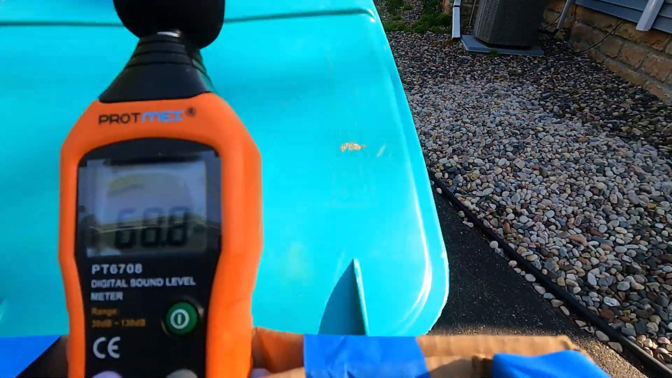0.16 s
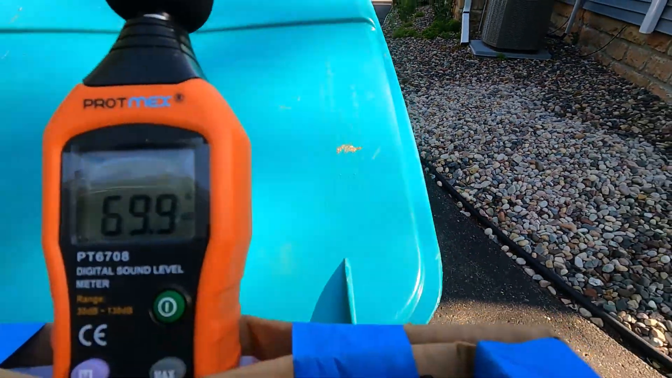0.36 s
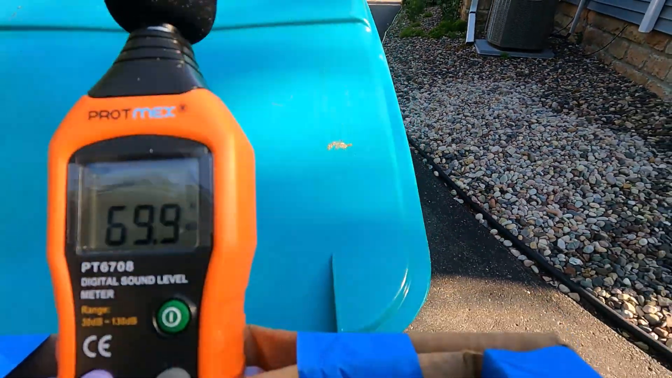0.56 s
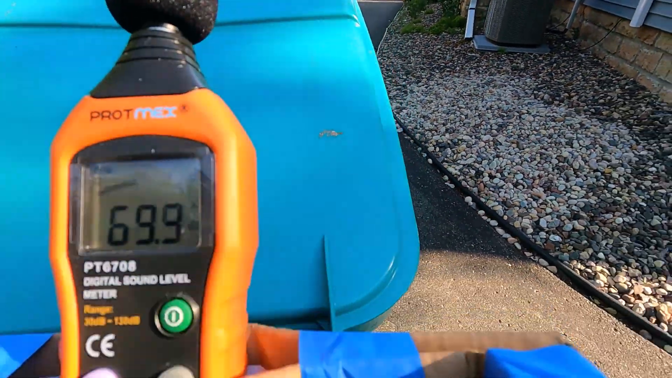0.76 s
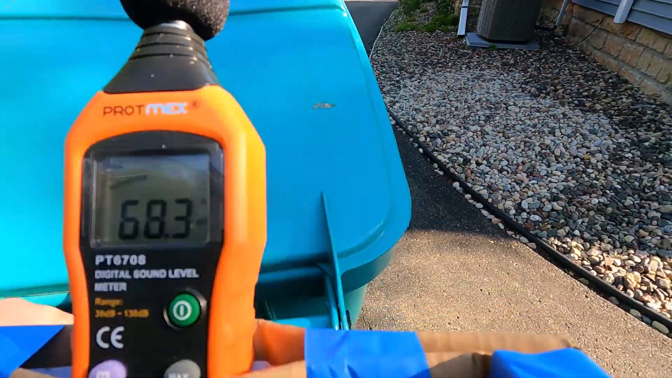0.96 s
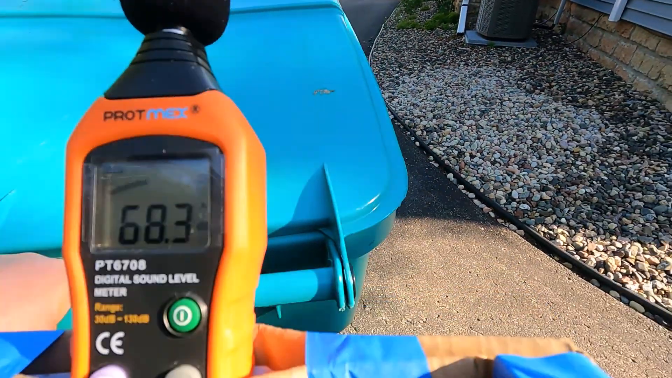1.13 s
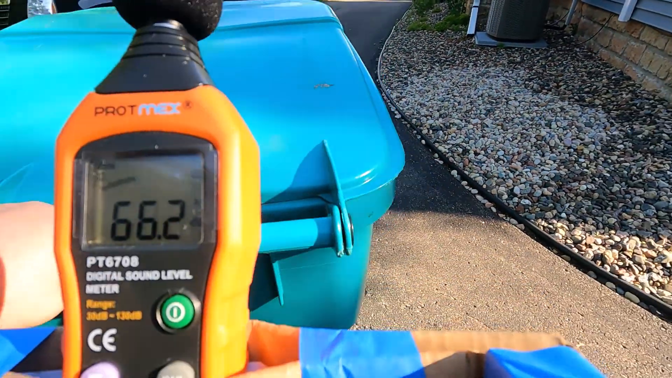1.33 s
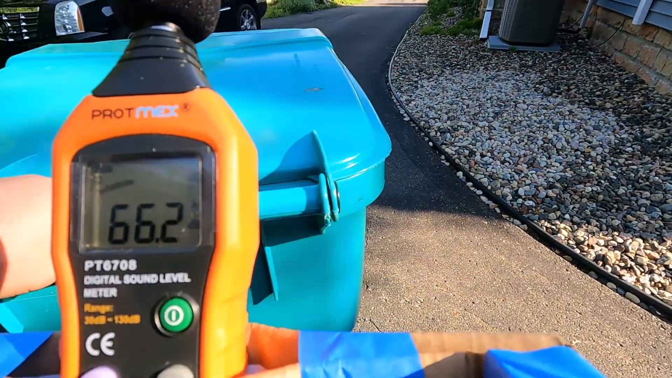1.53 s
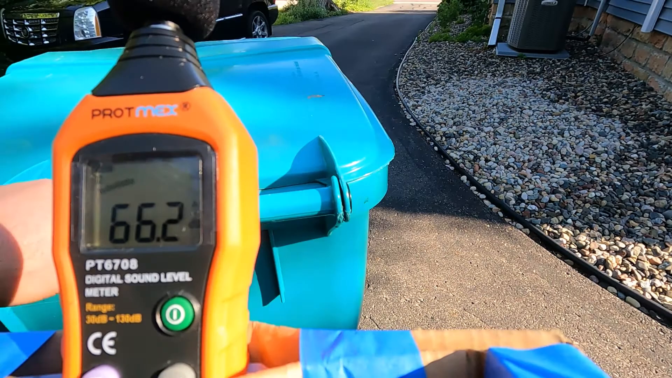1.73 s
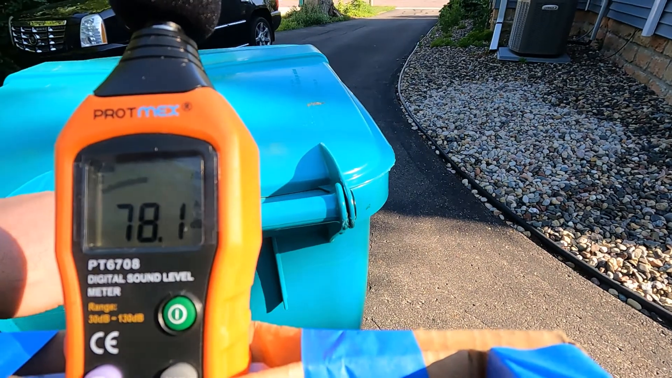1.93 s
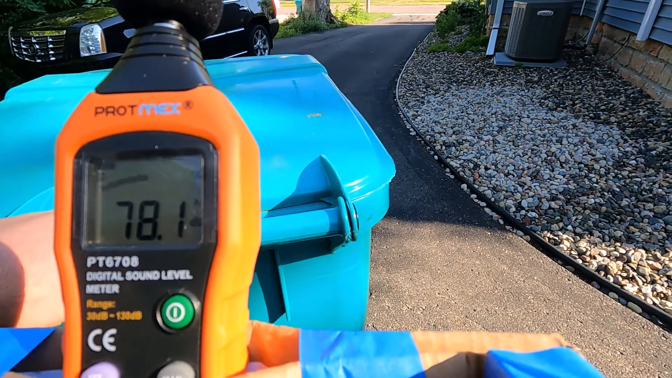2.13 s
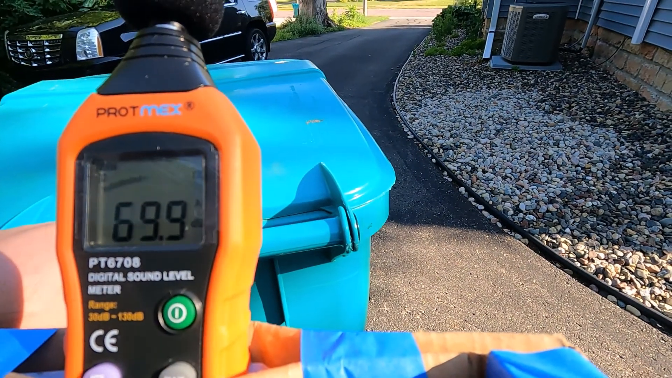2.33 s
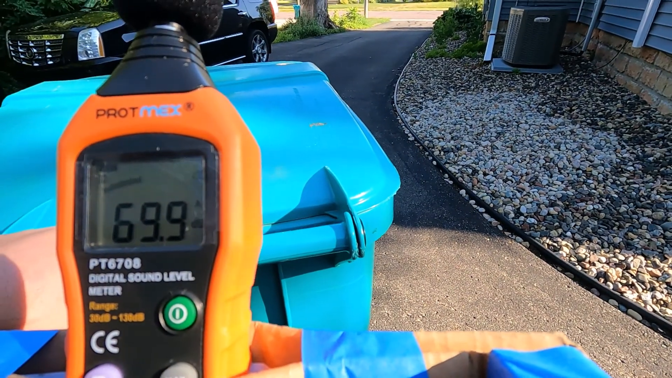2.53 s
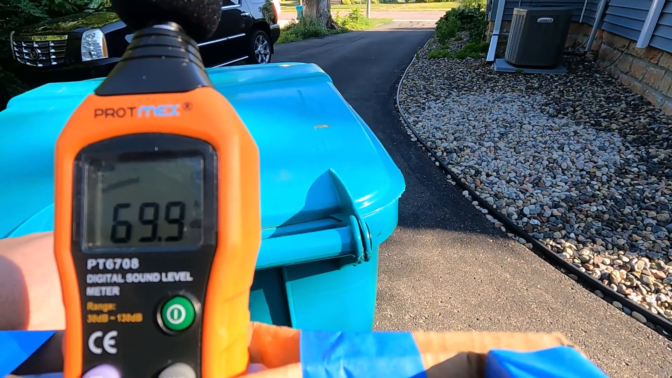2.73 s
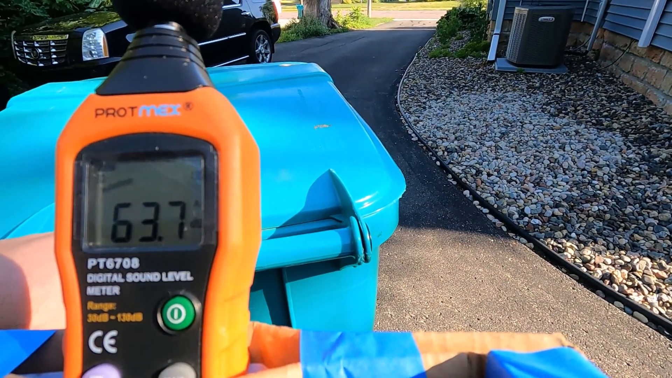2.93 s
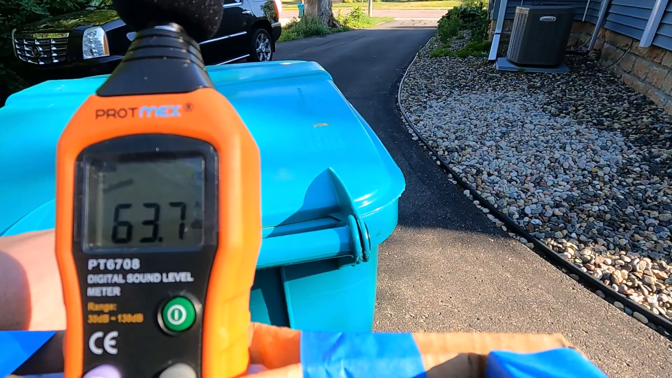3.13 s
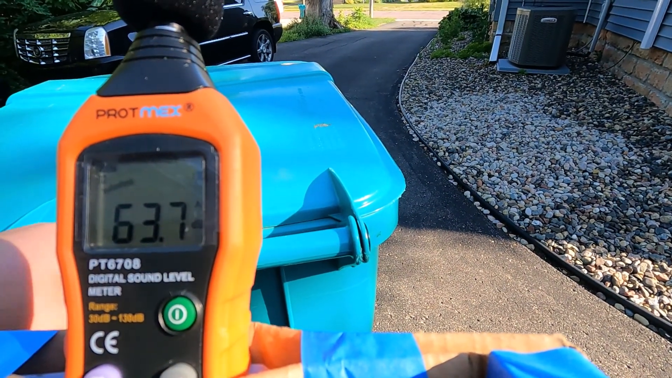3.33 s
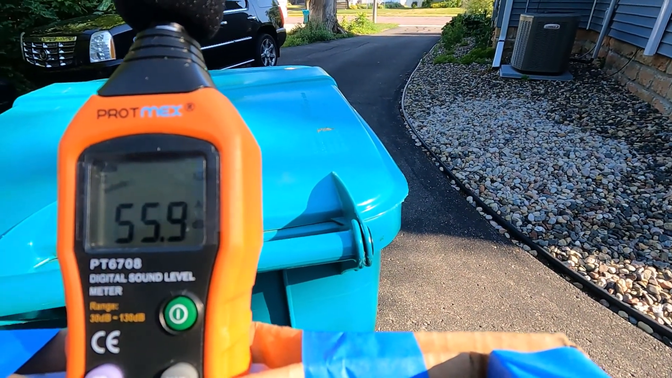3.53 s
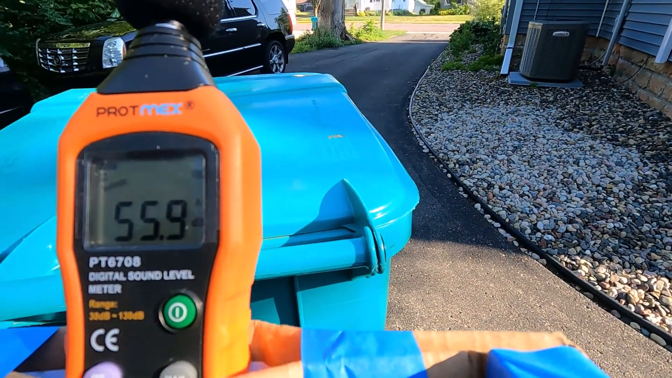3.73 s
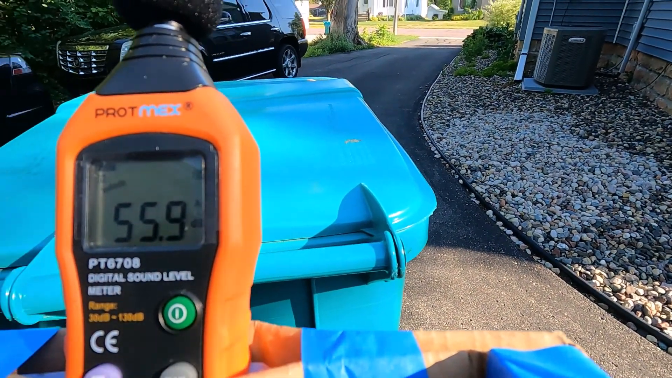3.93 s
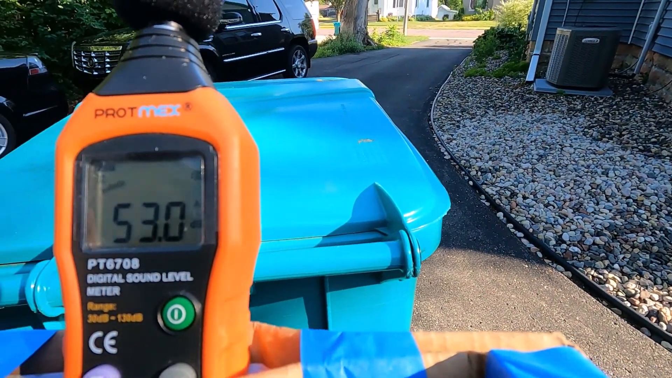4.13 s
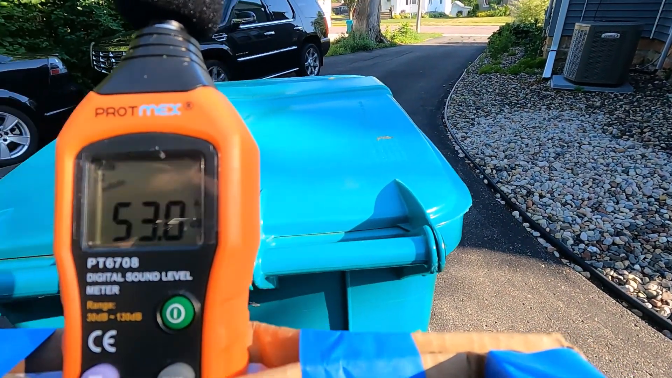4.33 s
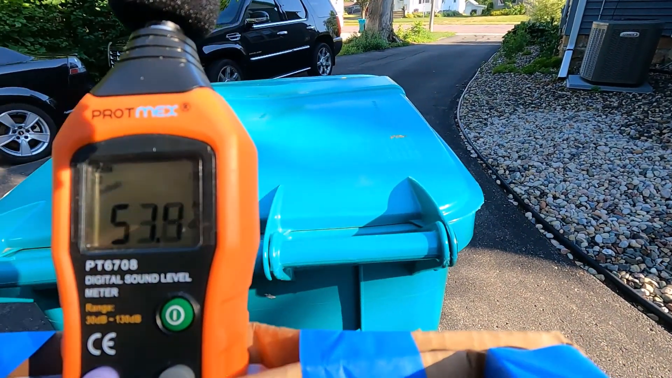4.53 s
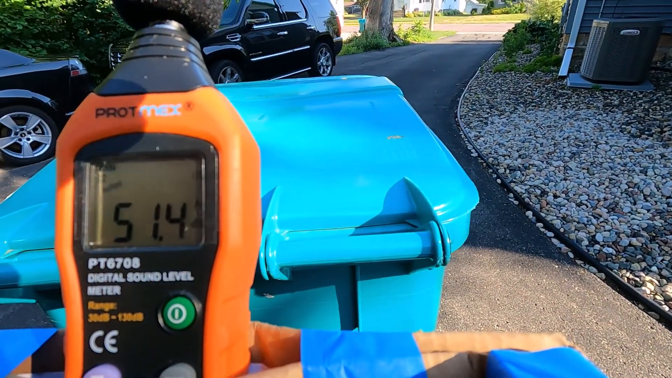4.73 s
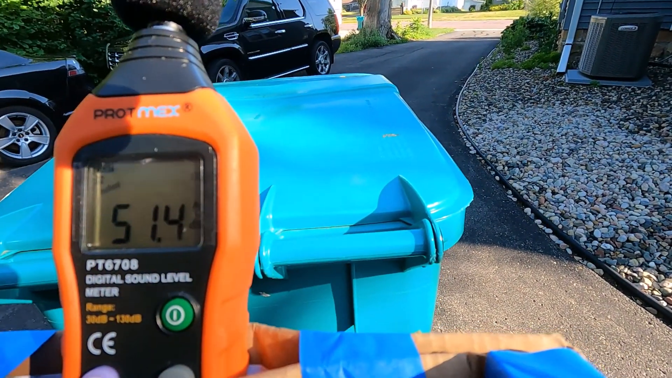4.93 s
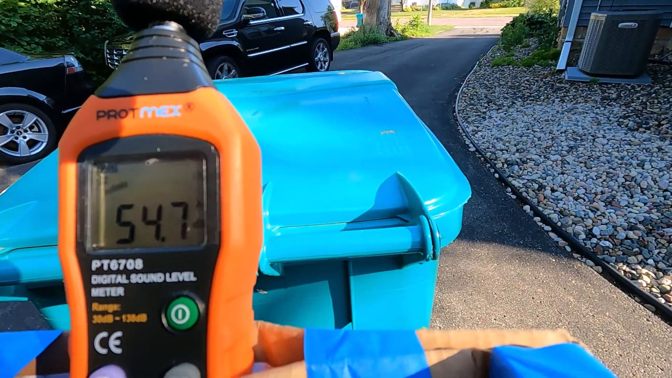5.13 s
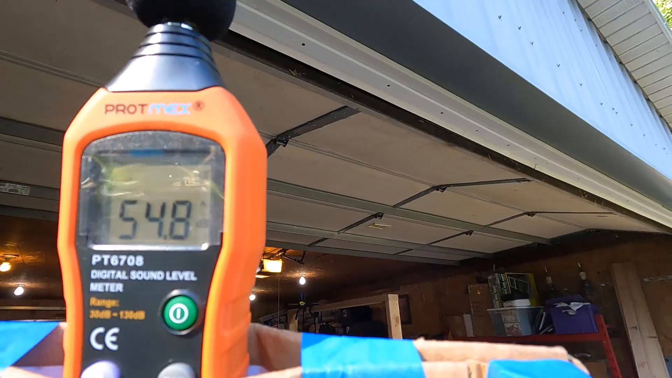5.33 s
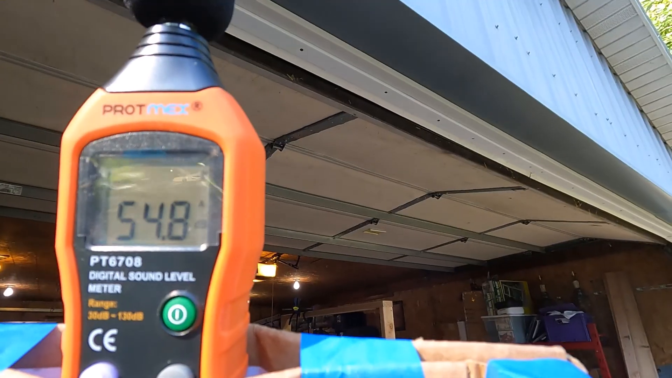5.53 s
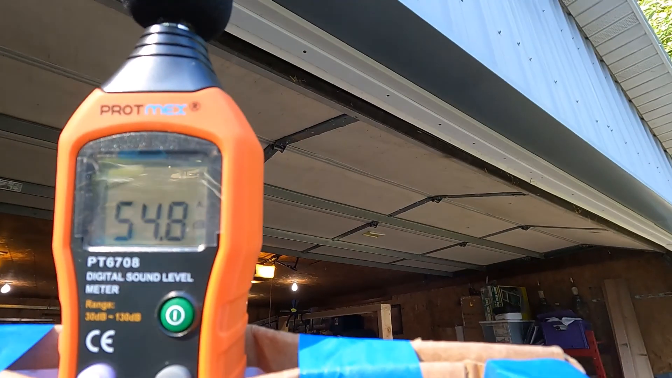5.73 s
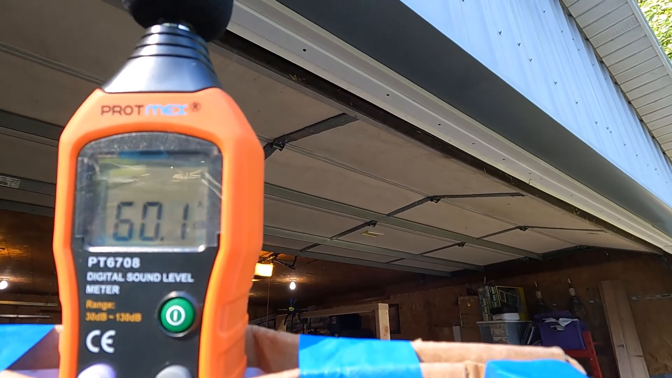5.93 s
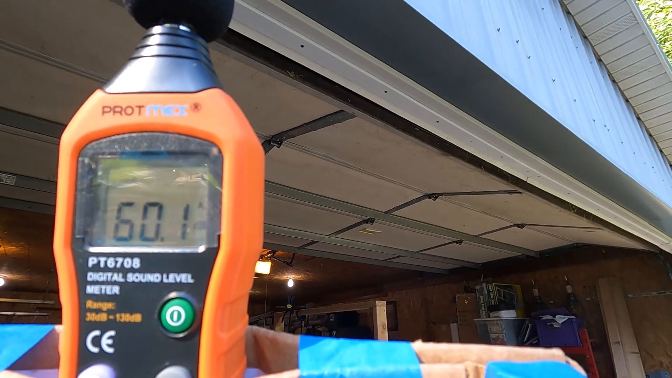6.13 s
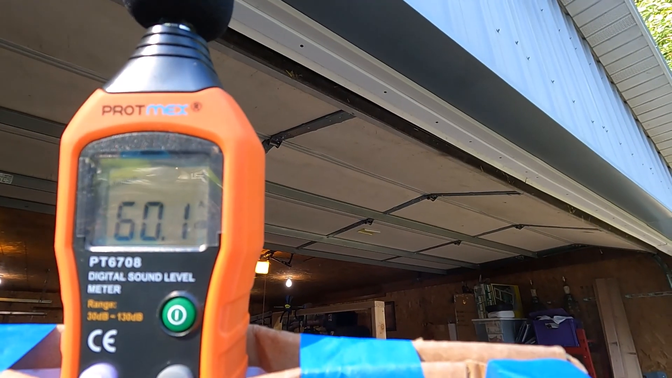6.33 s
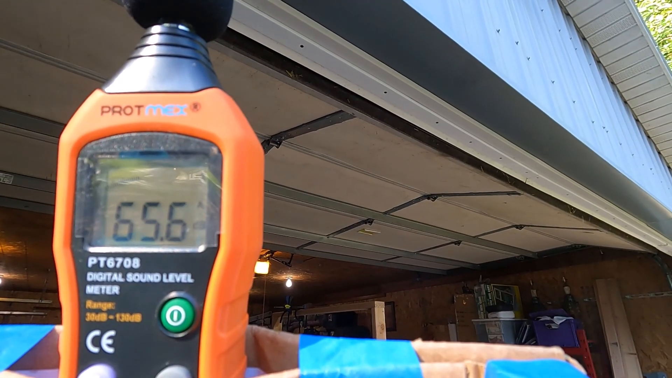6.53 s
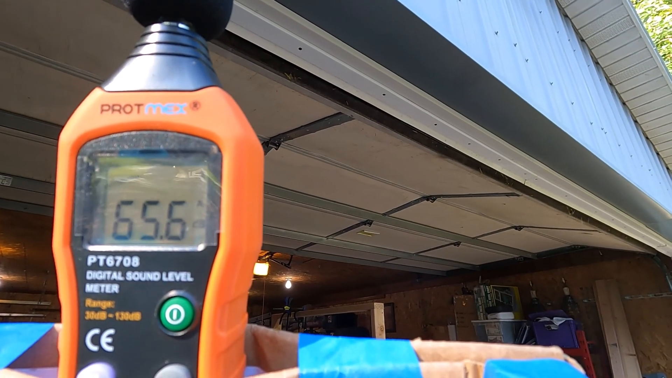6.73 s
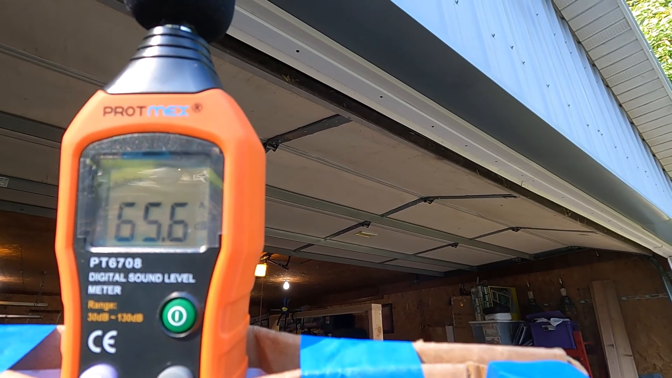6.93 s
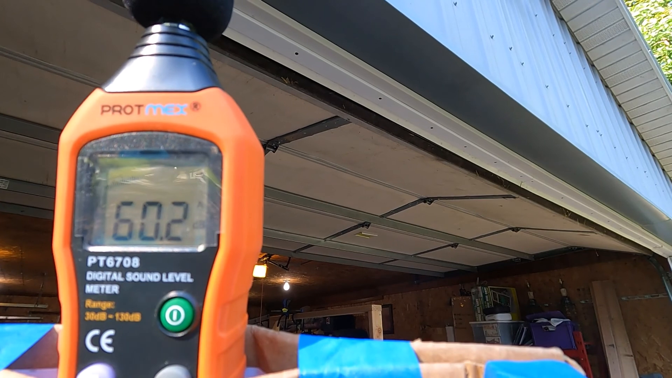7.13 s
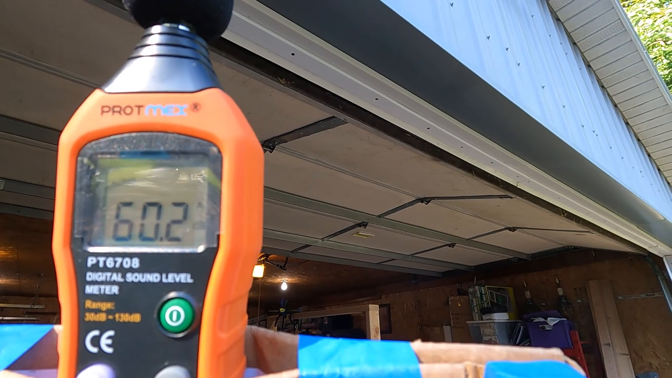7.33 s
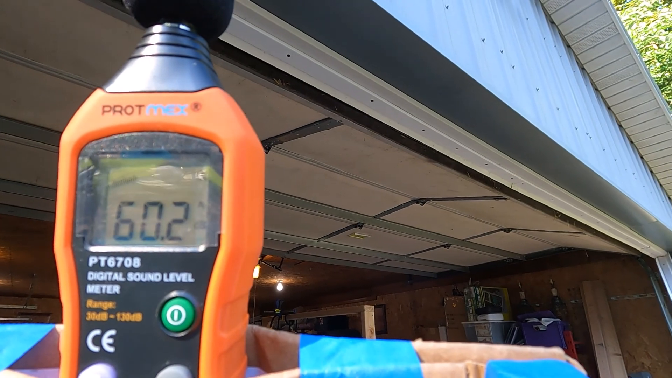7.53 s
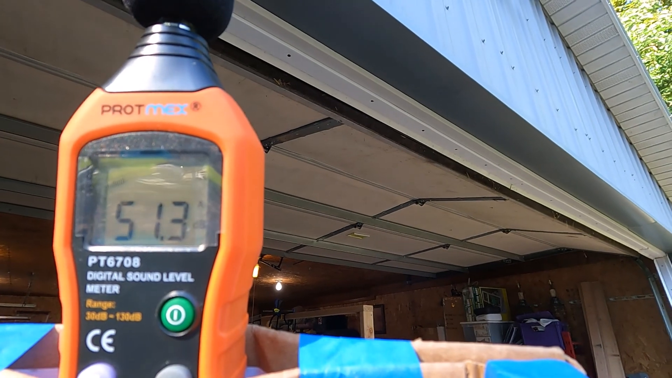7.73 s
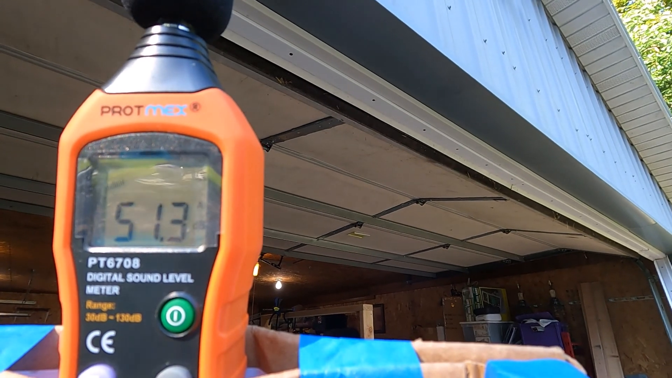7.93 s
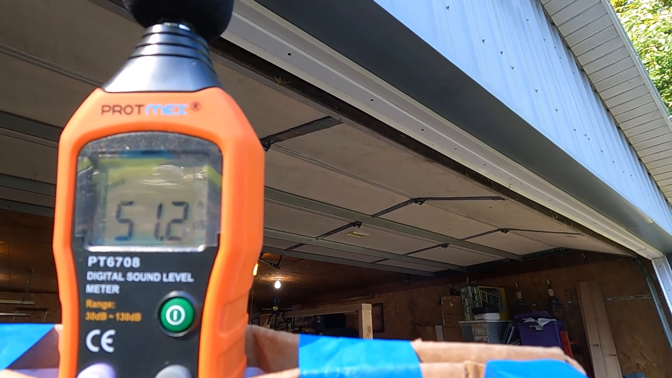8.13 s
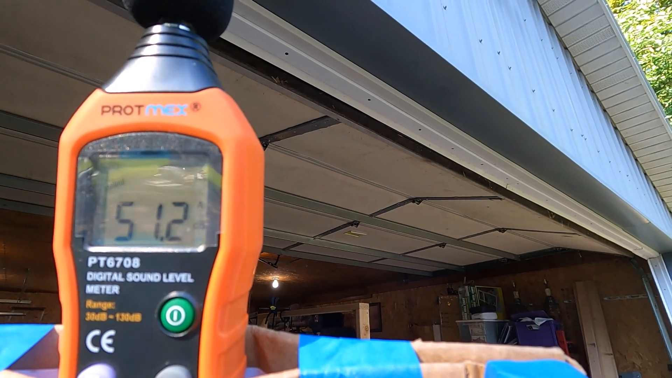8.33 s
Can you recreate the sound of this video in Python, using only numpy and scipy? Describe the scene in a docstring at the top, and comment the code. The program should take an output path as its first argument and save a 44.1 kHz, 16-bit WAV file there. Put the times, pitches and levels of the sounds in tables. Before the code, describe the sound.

A hollow plastic wheeled bin rumbles over gritty asphalt, lands upright with a heavy double knock, shudders quiet, then birds chirp over faint distant traffic.

```python
"""Wheeled bin on asphalt, with birds

A hollow bin, shaken by stones under its wheels, rumbles, is set upright with a knock and shudders to rest:
random pushes and blows ring a bank of panel modes. Shoes scuff and fingers tap the microphone's case
(shaped noise and pulses). Sparrows chirp and songbirds whistle (gliding sines) over traffic noise.
After a brief silence birds are heard from the mouth of a garage, through other echoes."""
import sys
import numpy as np
from scipy import signal
from scipy.fft import rfft, irfft
from scipy.io import wavfile
from scipy.ndimage import uniform_filter1d

SR = 44100
rng = np.random.default_rng(int(sys.argv[2]) if len(sys.argv) > 2 else 0)


def master_out(mix):
    """Clip the mix to full scale and print it as 16-bit PCM to the path in sys.argv[1]."""
    frames = np.transpose(np.atleast_2d(mix))
    ceiling = np.clip(frames, -1, 1)
    pcm = np.round(ceiling * 32767).astype(np.int16)
    wavfile.write(sys.argv[1], SR, pcm)


N = 369105
TIME = np.arange(N) / SR
SILENCE_START_S, SILENCE_END_S = 5.168, 5.272  # driveway before, garage after
LANDING_S = 1.458  # the bin is set upright

# Positive pan raises the left channel; spectra and modes are relative levels.
# air space and panels of the bin, ringing freely: f/Hz, level/dB, t60/s
BIN_MODES = [(42, -4, .2), (60, 0, .35), (80, -6, .3), (104, -1, .18), (121, 1.5, .25), (183, 1.5, .3),
             (202, -2, .2), (226, -1, .28), (254, -1, .22), (275, -1.5, .18), (305, -4, .2), (336, -7, .24),
             (366, -12, .12), (420, -16, .12), (476, -11, .22), (539, -10, .27), (574, -14, .3),
             (624, -22, .3), (711, -28, .3), (779, -17, .25), (830, -17, .3), (868, -22, .3),
             (918, -20, .22), (983, -17, .3), (1025, -20, .22), (1109, -21, .35), (1232, -27, .25),
             (1297, -29, .25), (1510, -25, .35), (1760, -21, .3), (1945, -23, .3)]
# spectrum of clicks and snaps: f/Hz, level/(dB per Hz)
TICK_SPECTRUM = [(400, -18.5), (1200, 5), (2500, 5), (3200, -2.5), (5000, -5), (7500, -9.5), (12000, -21),
                 (16000, -38.5)]
# wheels and rim dragging on the asphalt: t/s, rise/s, fall/s, level/dB, pan/dB
SCRAPES = [(0.596, 0.022, 0.06, -47, 3), (1.336, 0.053, 0.052, -49, 0.5), (1.392, .04, 0.079, -38.5, -2)]
# falling songbird note: t/s into the note, f/Hz, level/dB
SLUR_NOTE = [(0, 2750, -21), (.04, 2300, -6.5), (.09, 1980, 0.5), (.15, 1740, -3), (.2, 1600, -16)]


def from_db(db):
    """Decibels to gain."""
    return 10 ** (np.asarray(db) / 20)


def rms_one(x):
    """Scale to unit rms."""
    return x / np.sqrt(np.mean(x ** 2) + 1e-20)


def in_time(rows):
    """Read each column of a curve at every sample."""
    s, *columns = np.transpose(rows)
    return [np.interp(TIME, s, c) for c in columns]


def cut(x, hz, kind, order=2):
    """Butterworth filter."""
    return signal.sosfilt(signal.butter(order, hz, kind, fs=SR, output="sos"), x + 1e-18)


def resonance(x, hz, q):
    """Pass a narrow peak around hz."""
    return signal.lfilter(*signal.iirpeak(hz, q, fs=SR), x)


def panned(pan_db):
    """Left and right gains."""
    return from_db(np.array([[pan_db], [-pan_db]]) / 2)


def add(out, s, x):
    """Mix x in, starting at s."""
    i = max(round(s * SR), 0)
    out[..., i:i + x.shape[-1]] += x[..., :N - i]


def noise(spectrum, width=0.55, wide_hz=1100, size=N):
    """Coloured stereo noise of rms 1; the close-set ports hear the same bass."""
    hz = np.arange(size // 2 + 1) * SR / size + 1
    points, db = np.transpose(spectrum)
    gain = from_db(np.interp(np.log(hz), np.log(points), db))
    mid, side = rfft(rng.standard_normal((2, size))) * gain
    side = side * width * hz / np.hypot(hz, wide_hz)
    return rms_one(irfft([mid + side, mid - side], size))


def flutter(rate_hz, size=N):
    """Random wobble: lines between normal knots of spread 1."""
    knots = rng.standard_normal(size // 10)
    return np.interp(np.arange(size) * rate_hz / SR, np.arange(len(knots)), knots)


def burst(spectrum, t60, attack=0.0001):
    """Many dense modes struck at once: noise that dies away."""
    t = TIME[:SR // 2]
    return noise(spectrum, size=SR // 2) * from_db(-60 * t / t60) * (1 - np.exp(-t / attack))


def echoes(x, t60, delay, dull_hz):
    """Diffuse returns from walls, cars and trees, different at each ear."""
    t = TIME[:SR]
    tail = rng.standard_normal((2, SR)) * from_db(-60 * t / t60) * (t > delay)
    mid, side = tail
    tail = cut(mid + 0.5 * side * [[1], [-1]], dull_hz, "low", order=1)
    tail = tail / np.sqrt(np.sum(tail ** 2) / 2)
    return signal.fftconvolve(np.atleast_2d(x), tail, axes=1)[:, :N]


def steadied(x):
    """Even out slow swells, leaving the fast throb."""
    return x / np.sqrt(uniform_filter1d(x ** 2, size=4400) + 1e-12)


def swell(s, rise, fall, db):
    """A gain that climbs 20 dB over its rise and drops 20 dB over its fall."""
    return from_db(db - 20 * np.minimum(np.maximum((s - TIME) / rise, (TIME - s) / fall), 10))


def swells(rows, spectrum, grain_db):
    """Grainy noise under a row of swells."""
    level = sum(swell(s, rise, fall, db) * panned(pan_db) for s, rise, fall, db, pan_db in rows)
    grain = from_db(grain_db * (0.74 * flutter(500) + 0.63 * flutter(110)))
    return level * noise(spectrum) * grain


def ring(force, modes, sign=-1):
    """Modes ring in parallel, weighted sign**k: alternating at -1, in step when positive for a sudden start."""
    out = np.zeros(len(force))
    for k, (hz, db, t60) in enumerate(modes):
        r = from_db(-60 / (t60 * SR))
        w = 2 * np.pi * hz / SR
        mode = signal.lfilter([0, np.sin(w)], [1, -2 * r * np.cos(w), r * r], force + 1e-18)
        out += sign ** k * from_db(db) * mode
    return out


def panels(x):
    """Noise in the shell gathers at the pitches of its middle panel modes and thins out between them."""
    width_hz, peak_db, valley_share = 15, -2.5, .35
    strong = [hz for hz, db, _ in BIN_MODES if 450 < hz < 1150 and db > -24]
    peaks = sum(resonance(x, hz, hz / width_hz) for hz in strong)
    return x - valley_share * cut(x, [430, 1150], "band", order=1) + from_db(peak_db) * peaks


def gliding_band(x, hz, width_hz):
    """The part of x around a moving pitch, by shifting it to zero frequency and back."""
    carrier = np.exp(2j * np.pi * np.cumsum(hz) / SR)
    return 2 * np.real(cut(x / carrier, width_hz / 2, "low", order=1) * carrier)


def under_way():
    """Gain of the rolling: full until the landing, then dying fast."""
    stop_s = 0.11  # per 20 dB
    return from_db(-20 * np.clip((TIME - LANDING_S) / stop_s, 0, 10))


def shudder(db, rise, hold, db_per_s):
    """Gain of the shaking that the landing sets off: rise, hold, steady decay."""
    t = TIME - LANDING_S
    return np.clip(t / rise, 0, 1) * from_db(db - db_per_s * np.maximum(t - rise - hold, 0))


def rattle_shudder():
    """Gain of the rattle that the landing sets off."""
    return shudder(-38.5, rise=0.1352, hold=0.17, db_per_s=69)


def high_hiss():
    """A faint narrow band of noise, steady throughout."""
    centre_hz, width_hz, level_db = 11980, 500, -96.5
    edges_hz = [centre_hz - width_hz / 2, centre_hz + width_hz / 2]
    return from_db(level_db) * rms_one(cut(rng.standard_normal((2, N)), edges_hz, "band"))


def air(spectrum, low_db, murmur_db):
    """Coloured noise split into low rumble and murmur, each with its own level."""
    x = noise(spectrum, width=0.8, wide_hz=1130)
    rumble = rms_one(cut(x, 115, "low", order=4)) * from_db(low_db)
    return rumble + rms_one(cut(x, 125.5, "high", order=4)) * from_db(murmur_db)


def neighbourhood():
    """Distant traffic and a light breeze as noise; at the garage coloured differently, its murmur steady."""
    # air spectra of driveway and garage: f/Hz, level/(dB per Hz)
    drive_spectrum = [(15, -37), (25, 3.5), (44, -1), (81, -9), (196, -10), (286, -12), (326, -15),
                      (462, -21.5), (856, -41.5), (1350, -35.5), (2180, -48.5), (3540, -39), (7480, -54.5),
                      (10000, -66), (15000, -82)]
    garage_spectrum = [(15, -39), (25, 4.5), (101, -5.5), (172, -2), (293, -4), (383, -12.5), (558, -16),
                       (769, -36.5), (1090, -28), (2020, -37), (2700, -47), (3930, -41.5), (4260, -47),
                       (5570, -45), (9000, -54), (15000, -76)]
    # driveway air: t/s, low rumble/dB, murmur of distant traffic/dB
    drive_levels = [(2.35, -52.5, -65), (2.56, -54.5, -61), (3.32, -45, -54.5), (3.76, -51, -53.5),
                    (4.07, -50.5, -51), (4.9, -44, -53.5), (5.02, -47, -53.5)]
    # low rumble at the garage: t/s, level/dB
    garage_rumble = [(5.35, -57), (5.85, -51), (6.2, -63.5), (6.6, -55), (7.9, -57.5), (8.33, -51.5)]
    outside = TIME < SILENCE_END_S
    drive = air(drive_spectrum, *in_time(drive_levels))
    garage = air(garage_spectrum, in_time(garage_rumble)[0], -52.5)
    return outside * drive + ~outside * garage


def bird(note, calls, rough, overtone_db, trill=0, flutter_db=2, rasp_db=None):
    """A gliding, wavering, fluttering whistle with weak octave, optional trill and airy rasp, at each call."""
    trill_hz = 373.6
    # airy rasp in the voice: f/Hz, level/(dB per Hz)
    rasp_spectrum = [(3000, -27.5), (5500, -35), (7600, 6.5), (8600, -5), (12000, -6), (13500, -23)]
    s, hz, db = np.transpose(note)
    t, out = np.arange(s[0], s[-1], 1 / SR), np.zeros(N)
    for start, level_db, ratio in calls:
        waver = 1 + rough * flutter(900, size=len(t)) + trill * np.sin(2 * np.pi * trill_hz * t)
        phase = 2 * np.pi * np.cumsum(ratio * np.interp(t, s, hz) * waver) / SR
        octave = cut(np.sin(2 * phase), 8500, "low", order=4)
        voice = np.sin(phase) + from_db(overtone_db) * octave
        if rasp_db is not None:
            voice += from_db(rasp_db) * noise(rasp_spectrum, size=SR // 2)[0, :len(t)]
        level = from_db(level_db + np.interp(t, s, db) + flutter_db * flutter(170, size=len(t)))
        add(out, start + s[0], signal.get_window(("tukey", .08), len(t)) * level * voice)
    return out


def far_birds():
    """Birds further off: many random slurs blur into their own echoes."""
    # far chorus, before a 9.5 dB cut: t/s, level/dB
    chorus_levels = [(2.2, -69), (3.2, -56), (4.2, -63), (5.5, -63), (7.4, -67.5)]
    count = 200
    starts = np.linspace(0, TIME[-1] - .15, count)
    calls = np.column_stack([starts, np.zeros(count), np.ones(count)])
    calls = calls + rng.uniform([0, -6, -.3], [.1, 0, .4], (count, 3))
    song = bird(SLUR_NOTE, calls, rough=0.0493, overtone_db=-27.0)
    chorus = rms_one(echoes(song, t60=0.57, delay=0.0074, dull_hz=6000))
    return chorus * from_db(in_time(chorus_levels)[0] - 9.5)


def far_whines():
    """Thin wavering sines come and go over the driveway."""
    # faint far whines: t/s, rise/s, fall/s, level/dB, centre f/Hz
    whine_rows = [(3.0, .4, .45, -57.5, 505), (4.3, .4, .45, -56.5, 505), (3.3, .4, .4, -71, 1380),
                  (4.95, .7, .6, -69, 1380)]
    out = np.zeros(N)
    for s, rise, fall, db, hz in whine_rows:
        phase = 2 * np.pi * np.cumsum(hz * (1 + 0.018 * flutter(90))) / SR
        out += swell(s, rise, fall, db) * np.sin(phase)
    return out * (TIME < SILENCE_START_S)


def sparrow():
    """The sparrow opens with a buzz and sings with both sides of its syrinx: two glides at once."""
    # main voice, upper voice and opening buzz: t/s into the note, f/Hz, level/dB
    chirp = [(0.019, 3890, -13.5), (.026, 4620, 1), (.033, 4960, -3), (.039, 5318, 7), (.044, 4387, -4.5),
             (.051, 3920, -1.5), (.062, 3653, -9), (.076, 3652, -3), (.09, 3672, 0.5), (.1, 3605, 1.5),
             (.109, 3347, -1.5), (.114, 3083, -19), (.121, 3287, -7), (.128, 2515, -25)]
    upper = [(0.04, 5520, -16), (.048, 5200, -18.5), (.065, 4850, -18.5), (.085, 4900, -21),
             (.115, 4630, -26)]
    opening = [(0, 5660, -11), (.008, 5440, -15), (.017, 5500, -6), (.022, 5320, -18)]
    # chirps: t/s, level/dB, pitch ratio
    calls = [(0.836, -36.5, 0.97), (2.303, -37.5, 0.99), (3.396, -30.5, 0.99), (4.486, -26, 0.98),
             (5.661, -31.5, 0.98), (6.957, -31, 0.97), (7.965, -31.5, 0.99)]
    out = bird(chirp, calls, rough=.027, overtone_db=-29, trill=.035, flutter_db=3.5, rasp_db=-36)
    out += bird(upper, calls, rough=.035, overtone_db=-32, trill=.035, flutter_db=4.5)
    return out + bird(opening, calls, rough=.05, overtone_db=-40, trill=.17)


def warbler():
    """Quick arched warbles, up and then down."""
    # warble note: t/s into the note, f/Hz, level/dB
    warble = [(0, 3824, -12), (.008, 4530, -5.5), (.013, 4966, -1), (.022, 4000, -1), (.034, 3220, -16)]
    # warbles: t/s, relative level/dB, pitch ratio
    calls = [(2.433, -48, 0.91), (2.565, -54, 0.89), (2.588, -49, 0.94), (5.93, -51, .95),
             (5.985, -54, 0.87), (6.26, -62, 0.82), (7.205, -50, 0.98), (7.228, -52, 1.08),
             (7.27, -47.5, 0.91), (7.31, -57, 0.85), (7.53, -59, 1.3), (7.62, -60, 1.4), (7.69, -53, 0.84),
             (8.229, -51, 1.5), (8.232, -47, 1.1), (8.271, -43.5, 0.97), (8.31, -50, 1.16),
             (8.335, -56, 1.46)]
    return bird(warble, calls, rough=.008, overtone_db=-30, flutter_db=3)


def level_whistles():
    """Two nearly level whistles, the second lower."""
    # higher and lower whistle: t/s into the note, f/Hz, level/dB
    fee = [(-.08, 4030, -15), (0, 3980, -12), (.022, 3920, 1.5), (.12, 3870, 1), (.22, 3870, -2),
           (.26, 3850, -18)]
    bee = [(0, 3340, -10), (.05, 3400, -10), (.11, 3416, 0), (.22, 3400, 1), (.25, 3370, -12)]
    # calls of each: t/s, relative level/dB, pitch ratio
    fee_calls = [(7.43, -47.5, 0.99)]
    bee_calls = [(7.78, -52, 0.99)]
    out = bird(fee, fee_calls, rough=0.003, overtone_db=-45, flutter_db=.5)
    return out + bird(bee, bee_calls, rough=0.003, overtone_db=-45, flutter_db=.5)


def other_songbirds():
    """Whistled, twittered, slurred, rising, thin and lisping notes."""
    # note shapes: t/s into the note, f/Hz, level/dB
    whoit = [(0, 1780, -24), (.016, 1920, -8), (.034, 2090, 0), (.052, 2130, -1), (.064, 2150, -22),
             (.072, 3600, -36), (.081, 3350, -8), (.1, 2700, -6), (.122, 2220, -5), (.137, 2000, -24)]
    twitter = [(0, 6400, -16), (.008, 5850, -2), (.012, 5400, -13), (.016, 4750, -2), (.022, 4350, -8),
               (.025, 3800, -26), (.03, 3800, -4), (.037, 3950, 3), (.046, 3600, -4), (.056, 2950, -6),
               (.06, 2850, -16)]
    lift = [(0, 2800, -10), (.02, 3150, -2), (.04, 3500, -5), (.047, 3610, -12)]
    seet = [(0, 7700, -17), (.07, 7300, -6.5), (.11, 6260, -7), (.15, 6100, -2), (.18, 5990, 4)]
    lisp = [(0, 5290, -16), (.05, 5440, -4.5), (.12, 5450, -5), (.18, 5360, -12)]
    upslur = [(0, 2310, -10), (.1, 2520, -9), (.2, 2750, 0), (.27, 2855, -5)]
    # calls of each note: t/s, level/dB, pitch ratio
    whoit_calls = [(2.097, -61, 1), (2.412, -56.5, 0.99), (2.722, -52, 1), (3.055, -48.5, 0.96),
                   (3.382, -45.5, 0.99), (3.708, -45, 1.01), (4.030, -43.5, 1), (4.351, -47, 1),
                   (4.668, -47, 0.97), (4.99, -46.5, 0.97)]
    twitter_calls = [(2.061, -54.5, 1), (2.153, -54, 0.98), (2.247, -53.5, 0.97)]
    slur_calls = [(7.422, -58.5, 1), (7.775, -54, 1), (8.115, -53.5, 1)]
    lift_calls = [(2.507, -52.5, 0.94)]
    seet_calls = [(4.311, -48.5, 0.98)]
    lisp_calls = [(6.04, -68, 1), (6.37, -66, 1), (6.71, -63, .99), (7.38, -60, 0.95), (7.719, -58, 0.96)]
    upslur_calls = [(6.25, -61, 1.15), (6.71, -58.5, 1)]
    out = bird(whoit, whoit_calls, rough=.006, overtone_db=-30)
    out += bird(twitter, twitter_calls, rough=.012, overtone_db=-30, flutter_db=3)
    out += bird(SLUR_NOTE, slur_calls, rough=0.025, overtone_db=-22)
    out += bird(lift, lift_calls, rough=.01, overtone_db=-30)
    out += bird(seet, seet_calls, rough=.045, overtone_db=-48, trill=.07)
    out += bird(lisp, lisp_calls, rough=.035, overtone_db=-40)
    return out + bird(upslur, upslur_calls, rough=.07, overtone_db=-40)


def birds():
    """Songs arrive directly and by reflection; under the garage roof most arrives by reflection."""
    warble, whistles = warbler(), level_whistles()
    song = sparrow() + other_songbirds() + from_db(-2) * warble + from_db(-9.5) * whistles
    in_sight = from_db(-23) * warble + from_db(-16) * whistles  # echo-free share
    outside = TIME < SILENCE_END_S

    yard_song = song * outside
    direct = np.array([np.roll(yard_song, 1), yard_song])  # the left port hears it a sample later
    yard = from_db(-8.7) * direct
    yard = yard + from_db(-15) * echoes(yard_song, t60=0.17, delay=0.004, dull_hz=9000)
    yard = yard + from_db(-22.5) * echoes(yard_song, t60=0.62, delay=0.017, dull_hz=6000)

    garage_song = song * ~outside
    garage = from_db(-18.0) * garage_song
    garage = garage + from_db(-14.5) * echoes(garage_song, t60=0.27, delay=0.00138, dull_hz=9380)
    garage = garage + from_db(-25.0) * echoes(garage_song, t60=0.63, delay=0.047, dull_hz=6350)
    return yard * panned(1.6) + garage + in_sight


def high_buzzes():
    """Thin high buzzes of grainy noise."""
    # buzzes: t/s, rise/s, fall/s, level/dB, pan/dB
    buzz_rows = [(4.70, 0.018, 0.035, -58, 13), (4.87, 0.019, 0.064, -65.5, 20)]
    # buzz spectrum: f/Hz, level/(dB per Hz)
    spectrum = [(5500, -31), (7000, -7), (7800, 5), (8800, -17), (12000, -13), (14000, -35)]
    return swells(buzz_rows, spectrum, grain_db=4.0)


def taps():
    """A tap travels through the case, highs first and thump last; the far, left port hears it weaker and duller."""
    # finger taps on the case: t/s, pulse gain/dB
    tap_rows = [(2.295, -33), (2.93, -38), (3.195, -23.5), (3.463, -34.5), (3.488, -33.5), (3.551, -30.5),
                (3.901, -24.5), (4.023, -33), (4.2739, -11), (7.192, -26.5), (8.212, -37)]
    t = TIME[:SR // 10]
    phase = 3.7 * np.log(1 + t / .0005)  # falling pitch
    right = -np.sin(phase) * np.exp(-t / .007) * (1 - .8 * np.exp(-t / .004)) * 2.4
    right = cut(right, 10900, "low")
    left = from_db(-7) * cut(right, 1800, "low", order=1)
    out = np.zeros((2, N))
    for s, db in tap_rows:
        add(out, s, from_db(db) * np.array([left, right]))
    return out


def rubs():
    """The hand shifts its grip: grainy rubbing noise."""
    # rubs: t/s, rise/s, fall/s, level/dB, pan/dB
    rub_rows = [(3.915, 0.05, 0.031, -49, 1), (3.96, 0.069, 0.15, -46, 2.5),
                (4.905, 0.094, 0.083, -53.5, 4.5), (5.11, 0.13, 0.3, -61.5, 3)]
    # rub spectrum: f/Hz, level/(dB per Hz)
    spectrum = [(200, 12), (500, 10.5), (760, 2.5), (930, -4), (1220, 7), (1600, -1), (2100, 1),
                (3800, -4.5), (6400, -7.5), (7600, -9), (12500, -23), (14500, -45)]
    return swells(rub_rows, spectrum, grain_db=3.3)


def shoes():
    """A heel lands with a dull crunch; soles scuff over the ground."""
    # shoe scuffs: t/s, rise/s, fall/s, level/dB, pan/dB
    scuff_rows = [(5.41, 0.1, 0.052, -57.5, 4), (5.468, 0.034, 0.048, -54, 6),
                  (5.522, 0.039, 0.044, -34.5, 4.5), (5.552, 0.035, 0.096, -44, 0),
                  (5.574, 0.024, 0.019, -45, 3)]
    # spectra of scuff and heel crunch: f/Hz, level/(dB per Hz)
    scuff_spectrum = [(250, 8), (680, 2), (880, -1), (1300, 4), (1650, 15.5), (1950, 11), (2300, 9),
                      (2900, 4.5), (4600, 5.5), (7000, -5), (12000, -11.5), (16000, -23)]
    heel_spectrum = [(300, -3), (680, 5), (900, -13), (1500, 9.5), (2100, -5), (4000, -24), (12000, -46)]
    heel_s, heel_db, heel_t60_s = 5.485, -34.5, 0.15
    out = swells(scuff_rows, scuff_spectrum, grain_db=2.2)
    add(out, heel_s, from_db(heel_db) * burst(heel_spectrum, heel_t60_s, attack=0.0016))
    return out


def ticks():
    """Sharp clicks of lid, handle and axle, later of fingers on the case: noise with a peak, plus ringing modes."""
    # sharp clicks: t/s, level/dB before trim, t60/s, pan/dB, ring f/Hz
    tick_rows = [(0.045, -45, 0.073, 0, 4400), (.117, -50, 0.045, 1, 6500),
                 (0.198, -43.5, 0.056, 4.5, 2510), (0.234, -54, .03, 2, 2510), (0.376, -47, .04, 0, 4440),
                 (0.397, -40, 0.1, 1.5, 4370), (0.5152, -39.5, 0.0092, 0, 7000),
                 (.549, -49.5, .02, 0, 3440), (.6, -45, 0.055, 2.5, 1700), (.626, -49.5, .04, 0, 1500),
                 (0.87, -46.5, 0.056, 1, 1280), (1.122, -24, 0.05, -0.5, 2730), (1.127, -25, 0.03, 6, 6500),
                 (1.144, -45, 0.22, 0, 4930), (1.15, -40, 0.2, 1.5, 10900), (1.074, -45, 0.018, 0, 2650),
                 (1.124, -35.5, 0.037, 0.5, 1842), (1.281, -48, 0.01, 1.5, 2100),
                 (1.293, -39.5, 0.016, -2.5, 5250), (1.325, -39.5, .02, -.5, 8030),
                 (1.344, -43, 0.022, 2.5, 6650), (1.355, -37.5, .015, 1, 7390), (1.386, -35, .015, 1, 4400),
                 (1.393, -27.5, .03, 0, 4610), (1.4, -35.5, .018, 1, 4500), (1.408, -34.5, 0.018, 0, 4370),
                 (1.418, -39, .025, -1, 4600), (1.4938, -39.5, 0.081, -1, 3300),
                 (1.561, -33.5, 0.039, 2, 3280), (1.582, -26.5, 0.023, 1, 5370),
                 (1.606, -26, 0.016, 3, 7000), (1.701, -33, 0.016, -1, 5300),
                 (1.714, -31.5, 0.025, 1, 3600), (1.864, -45, .02, 2, 5000), (2.218, -47, .008, -3, 5980),
                 (3.393, -37, 0.0071, -4, 6980), (4.021, -31.5, 0.012, 12.5, 7000),
                 (4.023, -36, 0.038, 0, 700), (4.2723, -28.5, .004, -15, 5800), (7.294, -49, .008, 3, 4470)]
    # small stiff parts of lid and handle, pushed by every click: f/Hz, level/dB, t60/s
    fitting_modes = [(1583, -23, .13), (1850, -17, .06), (2552, -18, .075), (2750, -16, .05),
                     (3607, -17, .06), (3994, -27, .1), (4802, -28, .15), (6342, -28, .13),
                     (7230, -27, .09), (9970, -37, .09), (11520, -41, .09)]
    peak_db, peak_q = 8, 7.7
    out, force = np.zeros((2, N)), np.zeros(N)
    for s, db, t60, pan_db, hz in tick_rows:
        snap = burst(TICK_SPECTRUM, t60)
        snap = snap + from_db(peak_db) * resonance(snap, hz, peak_q)
        add(out, s, from_db(db - 7) * panned(pan_db) * snap)
        add(force, s, from_db([db + 1.0]) * min(t60 / .05, 1))  # brief clicks push less
    return out + ring(force, fitting_modes) * panned(1.5)


def grit_snaps():
    """Stones snap at random under turning wheels, hardest where they drag; loose parts clatter after landing."""
    rolling_db, relative_drag_db, relative_clatter_db = -66.5, -5, -7
    snaps_per_s, extra_drag_snaps_per_s = 49, 120  # extra at the hardest drag
    spread_db, t60_s = 3, 0.015
    dragging = sum(swell(s, rise, fall, db + relative_drag_db) for s, rise, fall, db, _ in SCRAPES)
    rate = snaps_per_s + extra_drag_snaps_per_s * np.sqrt(dragging / dragging.max())
    snaps = (rng.random(N) < rate / SR) * from_db(spread_db * rng.standard_normal(N))
    clatter = from_db(relative_clatter_db) * rattle_shudder()
    snaps = snaps * (under_way() * from_db(rolling_db) + dragging + clatter)
    return signal.fftconvolve(snaps[None], burst(TICK_SPECTRUM, t60_s), axes=1)[:, :N]


def scrapes():
    """Wheels and rim drag on the asphalt: grainy noise."""
    # scrape spectrum: f/Hz, level/(dB per Hz)
    spectrum = [(400, 11), (1300, 6.5), (2000, 2), (3000, -2), (4700, 0), (5800, -11.5), (7500, -5),
                (9000, -23), (12000, -28), (15000, -42.5)]
    return swells(SCRAPES, spectrum, grain_db=5.0)


def settling():
    """The base grinds briefly as the bin settles: grainy noise."""
    # grinds: t/s, rise/s, fall/s, level/dB, pan/dB
    grind_rows = [(1.979, 0.0034, 0.045, -45, 1), (2.007, 0.0049, 0.047, -44.5, -.5),
                  (2.026, .02, 0.013, -51, -.5)]
    # grind spectrum: f/Hz, level/(dB per Hz)
    spectrum = [(300, 2), (700, -1), (1200, 2.5), (2400, -3), (4000, -14.5), (6500, -21), (9000, -34),
                (14000, -50)]
    return swells(grind_rows, spectrum, grain_db=3.0)


def knocks():
    """Bumps and landing, later one dull knock during the handling: a push into modes, a lingering crack."""
    # blows: t/s, thud/dB before trim, crack/dB before panels, contact softness/Hz (scales both cutoffs)
    blow_rows = [(.048, -34, -30, 600), (0.117, -25, -45, 500), (0.16, -30, -45, 400),
                 (.310, -20.5, -31.5, 450), (0.32, -14, -27, 548), (.424, -12, -31, 450),
                 (.57, -28, -31.5, 690), (.646, -27.5, -34.5, 550), (.823, -32.5, -47.5, 600),
                 (.872, -33, -37.5, 700), (.905, -26, -33.5, 550), (1.069, -27, -43.5, 400),
                 (1.279, -25.5, -38.5, 500), (1.42, -21.5, -39, 450), (1.484, -23.5, -40, 450),
                 (1.534, -22, -36.5, 400), (1.5611, -13.5, -13.5, 1306), (1.567, -9.5, -16.5, 800),
                 (1.5809, -8.5, -16, 1090), (1.6044, -22.5, -16, 703), (1.622, -18, -25, 300),
                 (1.644, -15.5, -21, 300), (1.7013, -21.5, -21.5, 400), (1.716, -19, -24, 507),
                 (1.754, -21.5, -40, 450), (1.84, -36.5, -37.5, 700), (2.0049, -41.5, -54, 1000),
                 (4.0213, -36, -33, 550)]
    # crack spectrum: f/Hz, level/(dB per Hz)
    spectrum = [(250, -1.5), (500, 15), (690, 9.5), (950, 5.5), (1350, -1), (1800, -3.5), (3000, -15.5),
                (5500, -20), (8000, -31.5), (11000, -47.5), (15000, -48.5)]
    force, cracks = np.zeros(N), np.zeros((2, N))
    for s, thud_db, crack_db, soft_hz in blow_rows:
        push = cut(signal.unit_impulse(SR // 10), soft_hz * 0.89, "low")  # soft contacts are duller
        add(force, s, from_db(thud_db - 2.0) * push)
        crack = burst(spectrum, 0.016) + from_db(-10.0) * burst(spectrum, 0.32)
        add(cracks, s, from_db(crack_db) * cut(crack, min(4 * soft_hz, 15000), "low", order=1))
    shell = cut(ring(force, BIN_MODES, sign=0.93), 100, "high", order=1)
    side_panels = from_db(-2.5) * cut(shell, [320, 1150], "band")  # stiff, radiate best
    return shell + side_panels + panels(cracks) * panned(-.4)


def stones(order):
    """Random pushes of stones under a wheel, which bridges fine bumps; a second of run-in."""
    stones_per_s, bridge_hz = 200, 337
    hits = (rng.random(N + SR) < stones_per_s / SR) * rng.standard_normal(N + SR)
    return cut(hits, bridge_hz, "low", order=order)


def shaken_body():
    """The loaded bin rings under stone pushes, jolts pass straight through its frame, and it sways slowly."""
    # pitch at which the rolling bin's walls ring most strongly: t/s, f/Hz
    wall_tone = [(0.0, 173), (0.112, 213), (0.194, 177), (0.396, 210), (0.638, 194), (1.55, 212)]
    loaded_ring = 0.44  # share of ring time kept while pushed and jostled
    frame_db, sway_db, sway_hz = 36.5, 47, 38.4
    loaded = [(hz, db, t60 * loaded_ring) for hz, db, t60 in BIN_MODES]
    force, jolts = stones(order=5), stones(order=6)
    sway = from_db(sway_db) * cut(jolts, sway_hz, "low")
    frame = cut(from_db(frame_db) * jolts + sway, 33, "high")
    body = (ring(force, loaded) + frame)[SR:]
    return body + from_db(-1) * gliding_band(body, in_time(wall_tone)[0], width_hz=31)


def lurches():
    """The bin lurches on its wheels and its hollow booms: swelling low tones."""
    # lurches: t/s, level/dB, f/Hz
    lurch_rows = [(0.037, -10.5, 53.5), (0.152, -19, 51), (.295, -13.5, 57.5), (.667, -9.5, 53.7),
                  (0.905, -14, 62.3), (1.16, -19.5, 59), (1.35, -14, 45.6), (1.72, -14, 78),
                  (1.765, -13, 65)]
    return sum(swell(s, .06, .06, db) * np.cos(2 * np.pi * hz * (TIME - s)) for s, db, hz in lurch_rows)


def crunch_lumps():
    """Gain of grit: each stone crunches for a few milliseconds."""
    hits = (rng.random(N) < 90 / SR) * rng.exponential(1, N)
    return .6 + .55 * rms_one(cut(hits, 67, "low"))


def rolling():
    """Hard wheels on stones shake the bin and crunch grit; after landing it rings freely and shudders to rest."""
    # how hard the asphalt shakes the bin, relative to its mean: t/s, level/dB
    shaking_rows = [(0.0, -22.5), (0.342, -24.5), (0.702, -30), (0.874, -27.5), (1.384, -27.5), (1.54, -20)]
    # grit spectrum: f/Hz, level/(dB per Hz)
    grit_spectrum = [(300, 10.5), (500, 14), (1000, 0), (1400, -2), (2200, -13), (3500, -14), (6500, -21),
                     (9000, -30.5), (12000, -39.5), (15000, -54)]
    boom_db, wall_db, grit_db = -26.5, -26, -48.5  # nominal, at mean shaking
    boom_follows, grit_follows = .3, 0.63  # share of the shaking's swing
    grit_sag_db_per_s = 1  # the crunch fades as the wheels slow
    patch_db, patches_per_s = 3, 30  # coarse and smooth asphalt

    shaking_db, = in_time(shaking_rows)
    shaking_db = shaking_db - shaking_db[TIME < LANDING_S].mean() + patch_db * flutter(patches_per_s)
    moving, body = under_way(), shaken_body()

    boom_gain = moving * from_db(boom_db + boom_follows * shaking_db)
    boom_gain = boom_gain + shudder(-29, rise=0.11, hold=0.2239, db_per_s=65)
    boom = steadied(cut(body, 85, "low", order=4)) * boom_gain
    walls = steadied(cut(body, 85, "high", order=4)) * moving * from_db(wall_db + shaking_db)

    free = steadied(cut(ring(stones(order=5), BIN_MODES)[SR:], 100, "high"))
    free = free * shudder(-18.5, rise=0.1253, hold=0.0752, db_per_s=93)

    sag_db = grit_sag_db_per_s * (LANDING_S - TIME)
    crunch_gain = moving * from_db(grit_db + grit_follows * shaking_db + sag_db)
    grit = noise(grit_spectrum) * (crunch_gain + rattle_shudder()) * crunch_lumps()
    return boom + lurches() + walls + free + panels(grit)


def scene():
    """Near sounds return from the house wall; birds and traffic lie behind."""
    background = high_hiss() + neighbourhood() + far_birds() + far_whines() + birds() + high_buzzes()
    handling = taps() + rubs()
    near = shoes() + ticks() + grit_snaps() + scrapes() + settling() + knocks() + rolling()
    wall = from_db(-21.0) * echoes(cut(near, 540, "high"), t60=1.0, delay=0.0027, dull_hz=7050)
    return background + handling + near + wall


def record(dry):
    """The sound falls silent for a tenth of a second while the scene changes from driveway to garage, fading
    out and back in; the top is cut."""
    cutoff_hz = 15600
    knots_s = [SILENCE_START_S - .006, SILENCE_START_S, SILENCE_END_S - .004, SILENCE_END_S + .016]
    live = np.interp(TIME, knots_s, [1, 0, 0, 1])
    low_pass = signal.ellip(10, .1, 90, cutoff_hz, fs=SR, output="sos")
    return signal.sosfilt(low_pass, np.clip(dry * live, -1, 1))


dry = scene()
out = record(dry)
master_out(out)
```